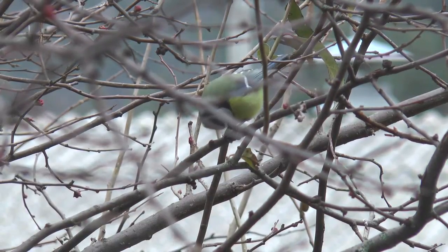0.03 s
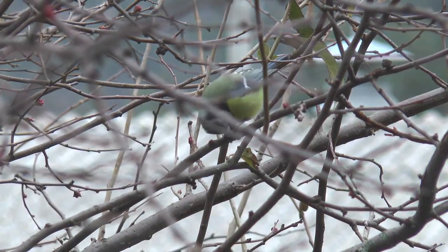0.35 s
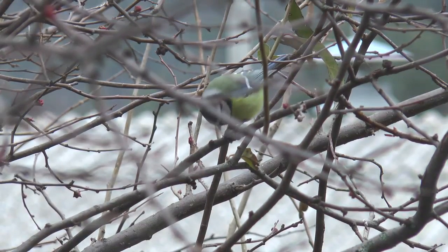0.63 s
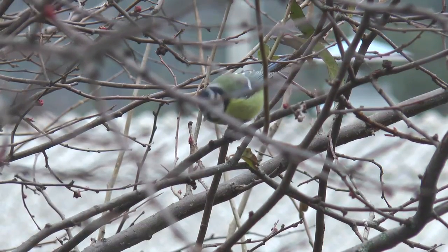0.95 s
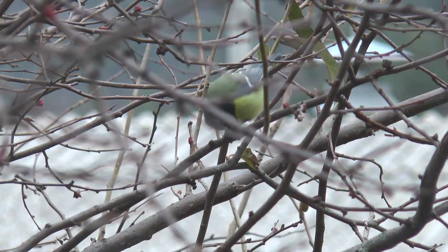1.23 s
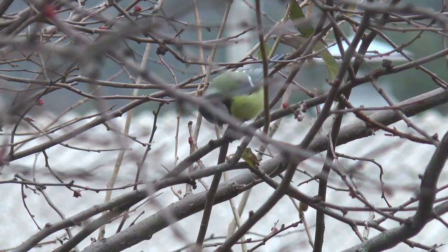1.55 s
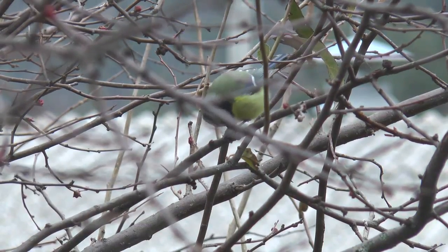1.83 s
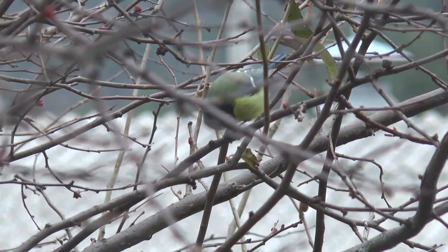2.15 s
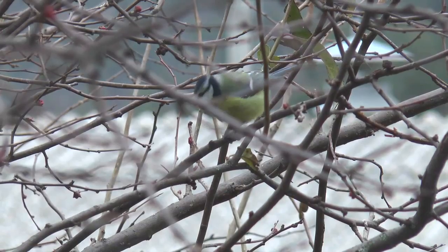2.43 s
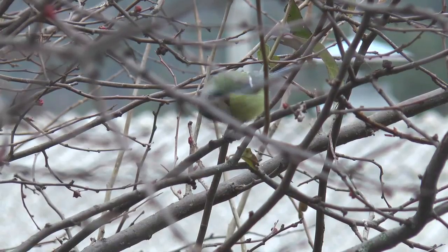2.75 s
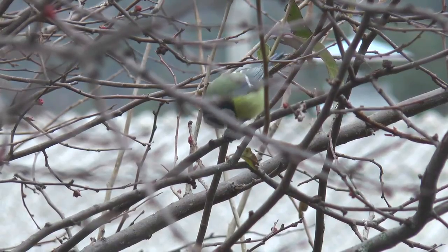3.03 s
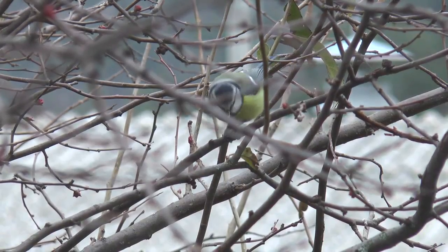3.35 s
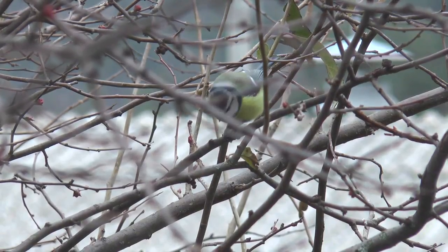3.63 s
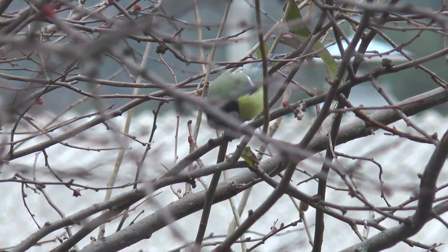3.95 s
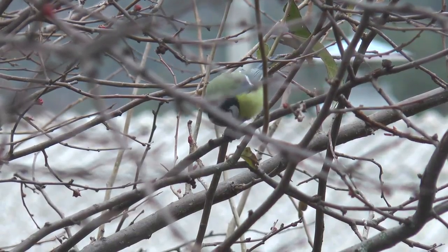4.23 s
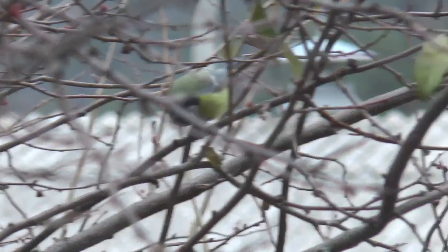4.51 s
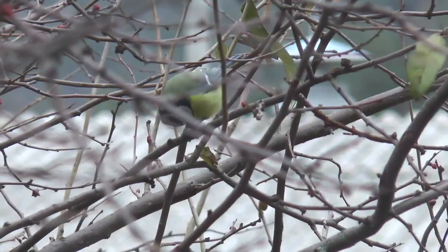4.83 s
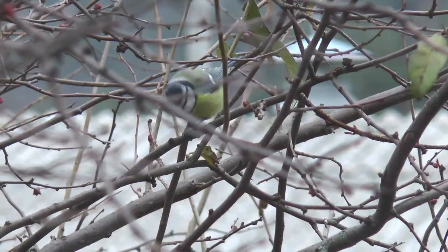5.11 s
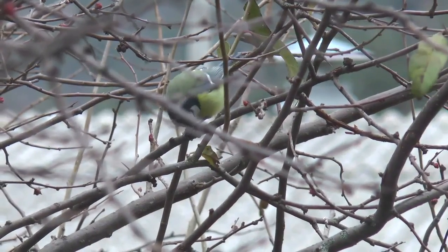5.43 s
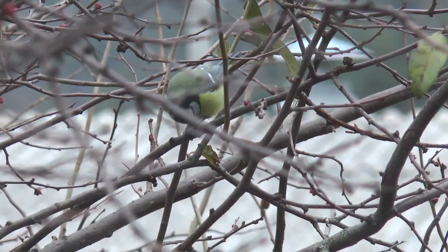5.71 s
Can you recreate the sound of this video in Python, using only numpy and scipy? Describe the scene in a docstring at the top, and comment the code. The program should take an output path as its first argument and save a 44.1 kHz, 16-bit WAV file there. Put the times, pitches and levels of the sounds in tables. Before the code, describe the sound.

A steady outdoor hiss with a soft rumble and faint low hum fills a damp garden. Small water drips pop and fine drops tick on twigs all around throughout. At the very start a bird gives one short quavering whistle, slightly to the right. From 0.5 to 1.2 seconds a distant bird trills five raspy falling notes. At about 1.9 seconds a close songbird, the loudest sound, sings two clear downward whistles, then quick buzzy chips and husky lower notes, ending with a falling swoop near 2.8 seconds. Nearby walls throw back a short echo. The drips and ticks carry on, growing busier between 4 and 4.6 seconds. Thin, faint calls come from far away at around 3.6, 4.9 and 5.7 seconds. A clearer drip lands at about 5.6 seconds, and the near bird gives one brief chirp just before 6 seconds.

```python
"""A damp winter garden beside a house. Small birds call, each note a nearly pure syrinx tone: a far trill
of falling notes, then a near phrase of slurred whistles and chips that the walls throw back.
Water drips (a pop plus spatter) and ticks in the bare twigs (short noise snaps),
over a steady outdoor hiss, a rumble and a faint low hum."""
import sys
import numpy as np
from scipy import signal
from scipy.fft import rfft, irfft
from scipy.io import wavfile
from scipy.ndimage import uniform_filter1d

SR = 44100
rng = np.random.default_rng(int(sys.argv[2]) if len(sys.argv) > 2 else 0)


def wrap_up_sound(samples):
    """Save the sound to the file named by the first command line argument, as 16-bit audio."""
    columns = np.atleast_2d(samples).T
    # keep every value between -1 and 1, then stretch to whole-number steps
    tamed = np.clip(columns, -1, 1)
    steps = np.round(tamed * 32767).astype(np.int16)
    wavfile.write(sys.argv[1], SR, steps)


N = 263277


def near_bird():
    """Main phrase: slurs arrive clean and direct, short notes raise more echo."""
    return nearby(slurs(), slap_db=-2.5, wash_db=-2.4) + nearby(short_notes(), slap_db=-1, wash_db=.2)


def slurs():
    """The near bird's clean gliding whistles."""
    # Each row: start and length in seconds, from and to in Hz, bend, crest as share of length, level in dB.
    whistles = [(1.898, 0.086, 3340, 2570, 0.9, 0.71, -15.5), (2.052, 0.069, 3323, 2766, 1.05, 0.84, -15.3),
                (2.192, 0.027, 2200, 2047, 0.41, 0.49, -23), (2.211, 0.0245, 2544, 2770, 1.0, 0.63, -14),
                (2.239, 0.0102, 2230, 1870, 1.16, .4, -23.5), (5.928, 0.035, 3045, 3150, 1.5, 0.33, -21)]
    song = np.zeros(N)
    for s, length_s, from_hz, to_hz, bend, crest, db in whistles:
        pitch = glide(length_s, from_hz, to_hz, bend)
        tone = note(pitch, crest, rise_db=10, fade_db=8, waver=.003, flutter_db=.8)
        add(song, s, amp(db) * tone)
    return song


def short_notes():
    """The near bird's buzzy chips, closing swoop and husky low notes."""
    # Each row: start and length in seconds, from and to in Hz, level in dB.
    chips = [(1.885, .016, 3800, 4250, -28.5), (2.042, .014, 3880, 3964, -26.5),
             (2.312, .018, 4440, 4420, -19.5), (2.333, .028, 3740, 4170, -19),
             (2.364, .018, 3820, 3950, -22), (2.535, .012, 4400, 4680, -23.5),
             (2.553, .022, 4600, 4720, -26), (2.559, .017, 3740, 4140, -18),
             (2.588, .023, 3760, 3940, -18.3)]
    # Start and length in seconds, from and to in Hz, settling time in seconds, level in dB.
    closing_swoop = (2.753, .036, 4202, 3125, .0062, -15.5)
    # Each row: start in seconds, level in dB.
    low_notes = [(2.445, -20.5), (2.673, -19.5)]
    song = np.zeros(N)
    for s, length_s, from_hz, to_hz, db in chips:
        pitch = glide(length_s, from_hz, to_hz, bend=.69)
        tone = note(pitch, crest=.52, rise_db=10, fade_db=5, waver=.0096, flutter_db=1.6, buzz=.033)
        add(song, s, amp(db) * rasp(tone, share=.1, width_hz=350))
    s, length_s, from_hz, to_hz, settle_s, db = closing_swoop
    pitch = swoop(length_s, from_hz, to_hz, settle_s)
    add(song, s, amp(db) * note(pitch, crest=.41, rise_db=12, fade_db=4, waver=.007, flutter_db=1))
    low_s, low_hz, drop_hz, drop_s = .034, 2265, 520, .0025
    pitch = low_hz - drop_hz * np.exp((np.arange(0, low_s, 1 / SR) - low_s) / drop_s)  # holds, then drops
    for s, db in low_notes:
        tone = note(pitch, crest=.56, rise_db=12, fade_db=5, waver=.017, flutter_db=2.2)
        add(song, s, amp(db) * rasp(tone, share=.06))
    return song


def trill():
    """Far bird: each raspy note drops from a high squeak and levels off, into diffuse echo."""
    # Each row: start of the fall in seconds, level in dB.
    falls = [(.519, -30.3), (.673, -29.3), (.824, -28.6), (.973, -29), (1.121, -27.8)]
    squeak_s, squeak_db = .026, -8
    squeak_hz = glide(squeak_s, from_hz=5400, to_hz=4700, bend=.6)
    fall_hz = swoop(length_s=.074, from_hz=4700, to_hz=2330, settle_s=.026)
    song = np.zeros(N)
    for s, db in falls:
        squeak = note(squeak_hz, crest=.6, rise_db=4, fade_db=3, waver=.03, flutter_db=2.5)
        add(song, s - squeak_s, amp(db + squeak_db) * rasp(squeak, share=.42))
        fall = note(fall_hz, crest=.8, rise_db=3, fade_db=3, waver=.014, flutter_db=1.2,
                    overtone_db=-45, buzz=.045)
        add(song, s, amp(db) * rasp(fall, share=np.linspace(.42, .06, len(fall))))
    return amp(-4.2) * pan(-4.5) * song + garden(song)


def whistler():
    """One quavering whistle from another tree, a little to the right."""
    # Start and length in seconds, pitch in Hz, level in dB.
    whistle = (0, .114, 2380, -27)
    s, length_s, hz, db = whistle
    depth_hz, rate_hz = 50, 24.8
    pitch = hz + depth_hz * np.sin(2 * np.pi * rate_hz * np.arange(0, length_s, 1 / SR))
    tone = note(pitch, crest=.88, rise_db=-1, fade_db=4, waver=.013, flutter_db=3, overtone_db=-45)
    song = np.zeros(N)
    add(song, s, amp(db) * tone)
    return pan(-4.5) * song + amp(-7.5) * garden(song)


def far_birds():
    """Thin distant calls, heard mostly as echo."""
    # Each row: start and length in seconds, from and to in Hz, level in dB, hoarse share of power.
    calls = [(.39, .05, 2980, 2520, -33.3, .3), (1.741, .036, 6400, 6350, -40, .05),
             (1.788, .036, 8030, 7870, -41.5, .05), (3.592, .04, 4680, 4550, -38, .4),
             (4.93, .15, 2060, 2020, -37.5, .5), (5.71, .11, 3450, 4030, -38.5, .2),
             (5.82, .06, 3550, 3200, -41, .3)]
    song = np.zeros(N)
    for s, length_s, from_hz, to_hz, db, hoarse in calls:
        pitch = glide(length_s, from_hz, to_hz)
        tone = note(pitch, crest=.73, rise_db=3, fade_db=6, waver=70 / from_hz, flutter_db=3,
                    overtone_db=-70)
        add(song, s, amp(db) * rasp(tone, hoarse))
    return amp(-3.2) * pan(-5) * song + amp(-.1) * garden(song)


def note(pitch_hz, crest, rise_db, fade_db, waver, flutter_db, overtone_db=-55, buzz=0, buzz_hz=230):
    """Slightly unsteady syrinx tone that swells to a crest and fades; high notes can buzz."""
    t = np.arange(len(pitch_hz)) / SR
    u = t / t[-1]
    arch_db = -np.where(u < crest, rise_db * (1 - u / crest) ** 2,
                        fade_db * ((u - crest) / (1 - crest)) ** 2)
    wobble, flutter = band(0, 270, size=16384)[:, :len(t)]
    buzz_depth = buzz * np.clip((pitch_hz - 3400) / 400, 0, 1)
    vibrato = buzz_depth * np.sin(2 * np.pi * (buzz_hz * t + rng.random()))
    phase = 2 * np.pi * np.cumsum(pitch_hz * (1 + waver * wobble + vibrato)) / SR
    edges = np.sin(np.pi / 2 * np.clip(np.minimum(t, t[-1] - t) / .00096, 0, 1)) ** 2
    tone = np.sin(phase) + amp(overtone_db) * np.sin(2 * phase)
    return amp(arch_db + flutter_db * flutter) * edges * tone


def glide(length_s, from_hz, to_hz, bend=1):
    """Eased pitch curve; a bend under 1 moves early."""
    u = np.linspace(0, 1, round(length_s * SR))
    return from_hz + (to_hz - from_hz) * np.sin(np.pi / 2 * u ** bend) ** 2


def swoop(length_s, from_hz, to_hz, settle_s):
    """Pitch curve that settles exponentially."""
    return to_hz + (from_hz - to_hz) * np.exp(-np.arange(0, length_s, 1 / SR) / settle_s)


def rasp(tone, share, width_hz=600):
    """Breaks a share of a tone's power into a hoarse band around its pitch."""
    noise = band(0, width_hz, size=16384)[0, :len(tone)]
    return tone * (np.sqrt(1 - share) + np.sqrt(share) * noise)


def nearby(song, slap_db, wash_db):
    """A close song with its ground bounce, wall slaps and a longer wash."""
    # Each row: delay in seconds, gain in dB.
    walls = [(.027, -10.5), (.057, -14)]
    # How strongly the garden returns each pitch. Each row: frequency in Hz, gain in dB.
    returns = [(2250, -5), (2550, -5), (2760, 1), (2950, -9), (3130, 3.5), (3300, -9), (3850, -1.5),
               (4140, 6), (4450, -6), (4750, -7)]
    ground_s, ground_db = .00362, -6.5  # the bounce makes falling slurs throb
    direct, slaps = song.copy(), np.zeros((2, N))
    add(direct, ground_s, amp(ground_db) * song)
    for delay_s, db in walls:
        for side in slaps:
            add(side, delay_s + rng.uniform(0, .00054), amp(db) * song)
    return_gain = amp(read(returns, np.fft.rfftfreq(N + SR, 1 / SR)))
    spill = irfft(rfft(np.pad(song, (0, SR))) * return_gain, N + SR)[:N]
    return amp(-1.6) * (pan(1) * direct + amp(slap_db) * slaps + amp(wash_db) * garden(spill))


def garden(x):
    """Diffuse echo from branches and walls: sparse taps, each band dying at its own rate."""
    # Each row: frequency in Hz, T60 in seconds.
    decay_times = [(500, 0.06), (2500, .5), (3200, 0.68), (4200, 0.5), (9000, 0.44)]
    taps_per_s, build_s = 2500, .0041
    taps = rng.standard_normal((2, SR)) * (rng.random((2, SR)) < taps_per_s / SR)
    hz, t, spectra = signal.stft(taps, SR, nperseg=256)
    envelope = amp(-60 * t / read(decay_times, hz)[:, None]) * (1 - np.exp(-t / build_s))
    tail = signal.istft(spectra * envelope, SR, nperseg=256)[1]
    tail *= np.sqrt(2) / np.linalg.norm(tail)
    return signal.fftconvolve(np.atleast_2d(x), tail, axes=1)[:, :N]


def dripping(small_count=320):
    """Close drips and two faint high chips, with many small drips all round."""
    # Each row: start in seconds, level in dB, pitch in Hz, left over right in dB, spatter gain.
    drips_and_chips = [(.007, -21, 1293, 15, .5), (.05, -28, 720, 4, .5), (.124, -26.5, 661, 18, .7),
                       (.35, -29, 4800, 0, 1), (.495, -28.5, 665, 9, .4), (.498, -29.5, 1100, 3, .7),
                       (.673, -27, 1800, 8, .5), (1.363, -29, 5100, 0, .8), (1.375, -27, 2300, 2, .6),
                       (1.543, -23.5, 1540, 4, 1), (1.551, -30, 2400, 3, 1.3), (1.67, -25, 1080, 17, .8),
                       (1.67, -28, 2700, 3, .8), (2.862, -28, 1670, 9, .4), (2.895, -28, 910, 8, .4),
                       (2.924, -30, 990, -4, .6), (3.204, -27, 3740, -2, .5), (3.204, -25.5, 1020, 5, .4),
                       (3.395, -29, 1200, 3, .5), (3.625, -29.5, 1440, 11, .7), (3.892, -30, 2280, 1, .4),
                       (3.99, -24, 4900, 2, .8), (3.994, -29.5, 1635, -1, .5), (4.009, -25.5, 4040, 1, .6),
                       (4.05, -28, 2550, 3, .6), (4.1, -21, 5320, 4, 1.2), (4.126, -30, 2550, 2, .9),
                       (4.142, -29.5, 1400, 5, .8), (4.186, -27.5, 1205, -5, .8), (4.203, -33, 800, 2, 1),
                       (4.208, -31, 2200, 2, 1), (4.243, -27, 1330, 4, .9), (4.244, -33, 600, 2, .7),
                       (4.299, -23.5, 2840, 2, .45), (4.315, -29, 1900, 2, .5), (4.384, -28, 1800, 2, .3),
                       (4.402, -30, 726, 15, .5), (4.496, -23, 4530, 4, .45), (4.523, -24.5, 3070, 2, .5),
                       (4.552, -28, 1890, 3, .4), (4.596, -30, 4600, 2, .4), (4.697, -30, 3480, 2, .3),
                       (4.827, -30, 2180, .5, .3), (5.037, -29, 690, 14, .4), (5.07, -29, 1490, 2, .3),
                       (5.358, -27.5, 1520, -5, .5), (5.644, -20.5, 990, -2, .35),
                       (5.763, -31, 600, -3.5, .4)]
    out = np.zeros((2, N))
    for s, db, hz, side_db, splash in drips_and_chips:  # the chips are at .35 s and 1.363 s
        time_scale = (hz / 1000) ** -.46  # higher pops are quicker
        pop = drip(hz, splash, rise_s=.0025 * time_scale, fade_s=.077 * time_scale)
        add(out, s, amp(db) * pan(side_db) * pop)
    for when, size, pitch, side in rng.random((small_count, 4)):
        pop = drip(hz=740 * 2 ** (2.7 * pitch), splash=.6, rise_s=.003, fade_s=.093)
        add(out, when * N / SR, amp(-39 + 6.5 * size ** 2) * pan(18 * (side - .45)) * pop)
    return out + amp(-13.5) * garden(out)


def drip(hz, splash, rise_s, fade_s):
    """A round pop that dies fast and a longer dull spatter at the same pitch, as when a drop lands."""
    t = np.arange(4096) / SR
    cycles = hz * t + rng.random() + .31 * rng.random((2, 1))
    ring = np.sin(2 * np.pi * cycles) * amp(-100 * t / fade_s)
    spatter = band(hz, .42 * hz + 60, size=4096) * amp(-55 * t / fade_s)
    return (1.47 * ring + splash * spatter) * np.tanh(t / rise_s) ** 2


def ticking(faint_count=400):
    """Fine drops on twigs: a few clear ones and a faint patter."""
    # Each row: start in seconds, level in dB, pitch in Hz.
    clear_ticks = [(.2095, -27.5, 6700), (.612, -27, 5000), (.8092, -23.5, 6700), (1.129, -25, 6700),
                   (1.359, -26.5, 6700), (1.577, -29, 4200), (1.648, -29, 4500), (2.978, -22.5, 6700),
                   (3.091, -25, 4300), (3.131, -27, 8000), (3.165, -28, 5300), (3.319, -26, 5500),
                   (3.646, -27, 2900), (3.991, -26, 6700), (4.1, -26, 6700), (4.225, -25, 6700),
                   (4.892, -25, 8000), (5.622, -29, 4000), (5.78, -28, 2900), (5.85, -25, 3210),
                   (5.882, -24, 3350)]
    out = np.zeros((2, N))
    for s, db, hz in clear_ticks:
        side_db = rng.uniform(-6, 5.61)
        snap = tick(hz, decay_s=.0013, width_hz=.00017 * hz ** 2)  # low knocks ring, high snaps are broad
        add(out, s, amp(db) * pan(side_db) * snap)
    for when, size, pitch, side in rng.random((faint_count, 4)):
        snap = tick(hz=2500 + 9000 * pitch, decay_s=.0012, width_hz=8000)
        add(out, when * N / SR, amp(-42 + 13 * size ** 2) * pan(16 * (side - .5)) * snap)
    return out


def tick(hz, decay_s, width_hz, rise_s=.0012, rustle_s=.019):
    """A short bright snap with a faint rustle behind it."""
    t = np.arange(2048) / SR
    envelope = np.tanh(t / rise_s) ** 2 * (np.exp(-t / decay_s) + .075 * np.exp(-t / rustle_s))
    return 1.7 * band(hz, width_hz, size=2048) * envelope


def background():
    """Hiss, rumble, a wavering hum and a few soft low bumps."""
    # Each row: frequency in Hz, relative spectral density in dB.
    hiss_spectrum = [(250, -33), (480, -8.5), (570, 3), (800, -1.5), (1200, 0), (2000, 0), (3000, -2),
                     (4700, -5), (6400, -13), (8000, -10.5), (9200, -14), (12500, -18), (15500, -31.5)]
    rumble_spectrum = [(20, -2), (60, -1), (97, 1), (120, -12), (250, -4.5), (330, -5), (380, -2.5),
                       (520, -24.5)]
    # Each row: time in seconds, hiss level in dB.
    breeze = [(0, -35), (1.3, -33.3), (2, -35.8), (3.2, -35.2), (4.2, -35.5), (5.95, -35.3)]
    # Each row: centre and width in Hz, level in dB.
    hum_bands = [(79, 18, -64), (323.6, 52, -59), (417.3, 18, -57.3)]
    # Each row: midpoint in seconds, level in dB.
    bumps = [(2.25, -51), (2.501, -55.5), (2.66, -47.5), (4.48, -49), (5.275, -49)]
    hiss_db = np.interp(np.arange(N) / SR, *np.transpose(breeze))
    out = amp(hiss_db) * air(hiss_spectrum, patchy_db=3, flicker_db=1.1, size=1024)
    out += amp(-51) * air(rumble_spectrum, patchy_db=2, flicker_db=1, size=4096)
    for hz, width_hz, db in hum_bands:
        out += amp(db) * band(hz, width_hz, size=N)
    swell = signal.windows.hann(4096)
    for s, db in bumps:
        add(out, s - len(swell) / SR / 2, amp(db) * swell * band(hz=174, width_hz=87, size=4096)[0])
    return out


def air(spectrum, patchy_db, flicker_db, size):
    """Outdoor noise whose level drifts in small patches and flickers as a whole."""
    # Each row: frequency in Hz, left-right correlation.
    correlations = [(30, 0.33), (700, -0.21), (3500, -0.12), (4900, -0.06), (5700, 0.42), (8000, -0.52),
                    (9300, 0), (11700, -0.2), (13000, 0)]
    # Each row: frequency in Hz, left over right in dB.
    balances = [(30, 5), (150, 4.5), (330, -4.5), (600, 2.5), (1400, 2), (3000, 0)]
    hz, hop = np.fft.rfftfreq(size, 1 / SR), size // 4
    left_re, left_im, other_re, other_im, patches = rng.standard_normal((5, N // hop + 5, len(hz)))
    patches = unit(uniform_filter1d(uniform_filter1d(patches, size=5, axis=0), size=11, axis=1))
    patches /= 1 + (hz / 6000) ** 2  # the highest hiss is smoother
    flicker = unit(uniform_filter1d(rng.standard_normal((len(patches), 1)), size=9, axis=0))
    same = read(correlations, hz)
    left = left_re + 1j * left_im
    right = same * left + np.sqrt(1 - same ** 2) * (other_re + 1j * other_im)
    level_db = read(spectrum, hz) + patchy_db * patches + flicker_db * flicker
    spectra = np.array([left, right]) * amp(level_db) * pan(read(balances, hz))
    return unit(signal.istft(spectra.swapaxes(1, 2), nperseg=size, noverlap=size - hop)[1][:, :N])


def band(hz, width_hz, size):
    """Two channels of noise in one resonance."""
    f = np.fft.rfftfreq(size, 1 / SR)
    return unit(irfft(rfft(rng.standard_normal((2, size))) / (1 + (2 * (f - hz) / width_hz) ** 2), size))


def amp(db):
    """Decibels to gain."""
    return 10 ** (np.asarray(db) / 20)


def unit(x):
    """Scales to rms 1."""
    return x / np.sqrt(np.mean(x ** 2) + 1e-20)


def read(points, hz):
    """Reads a table on a log-frequency axis."""
    f, value = np.transpose(points)
    return np.interp(np.log(hz + 1), np.log(f + 1), value)


def add(mix, s, sound):
    """Adds a sound into the mix at s seconds."""
    part = mix[..., max(round(s * SR), 0):][..., :sound.shape[-1]]
    part += sound[..., :part.shape[-1]]


def pan(db):
    """Constant-power column of stereo gains; positive dB is left."""
    gains = amp(np.array([db, -db]) / 2)
    return (gains / np.sqrt(np.mean(gains ** 2, axis=0)))[:, None]


def scene():
    """Birds, drips and air together."""
    return near_bird() + whistler() + trill() + far_birds() + dripping() + ticking() + background()


def record(dry):
    """Steep low-pass on the top treble."""
    edge_hz = 15900
    return signal.oaconvolve(dry, signal.firwin(511, edge_hz, window=("kaiser", 9), fs=SR)[None], "same")


dry = scene()
out = record(dry)
wrap_up_sound(out)
```